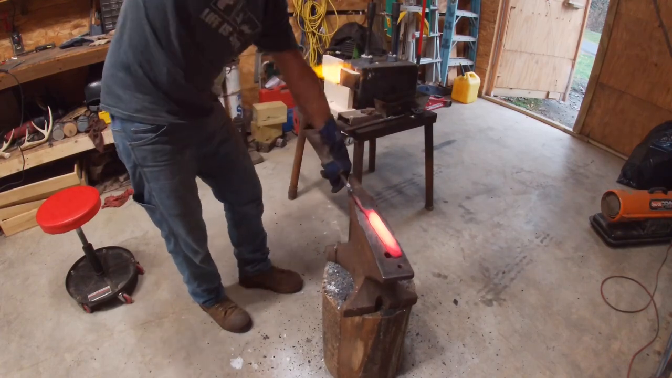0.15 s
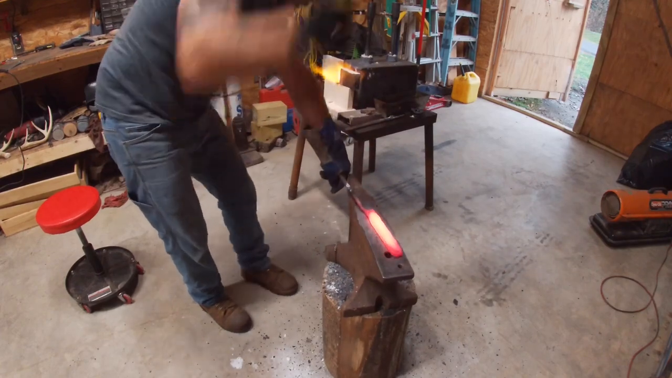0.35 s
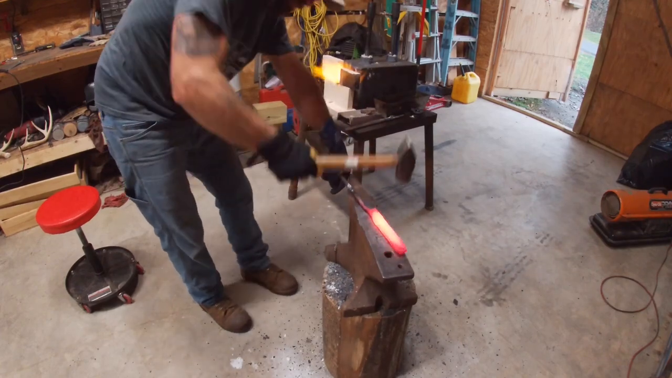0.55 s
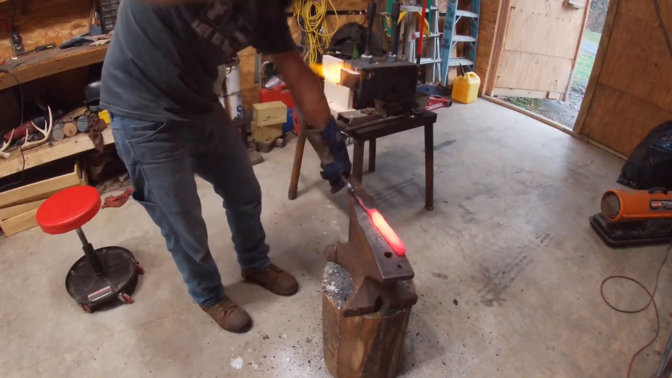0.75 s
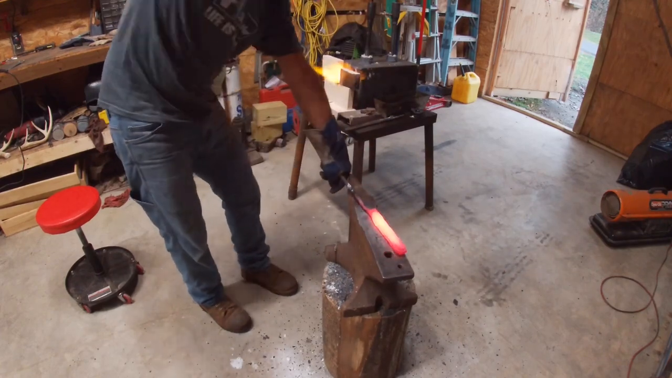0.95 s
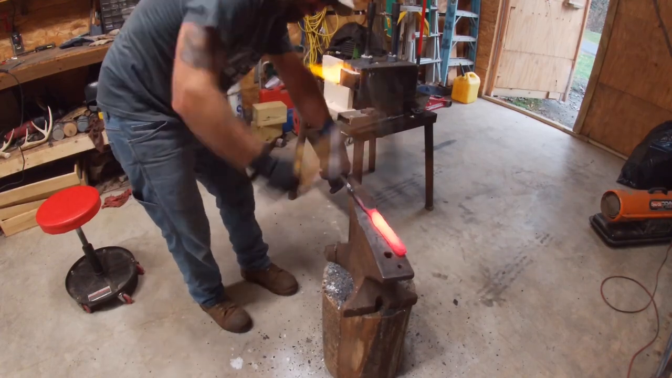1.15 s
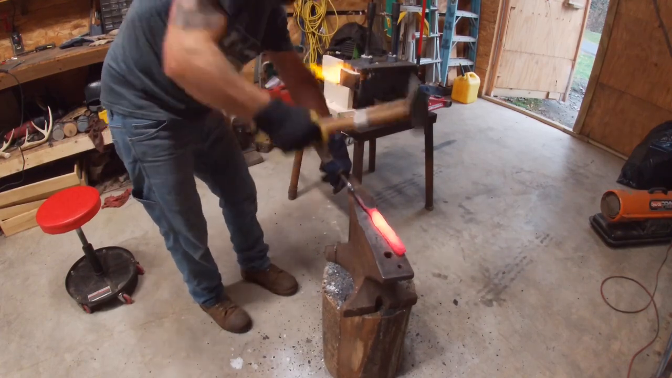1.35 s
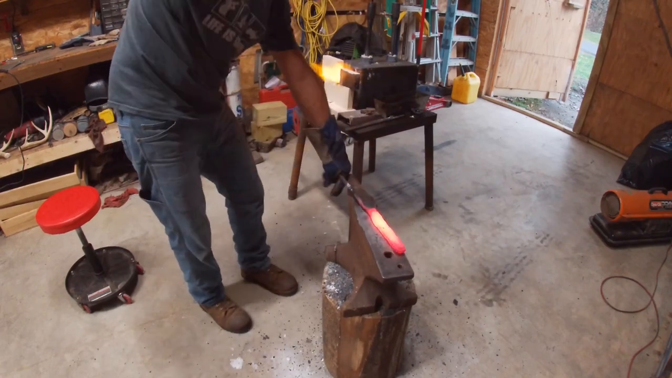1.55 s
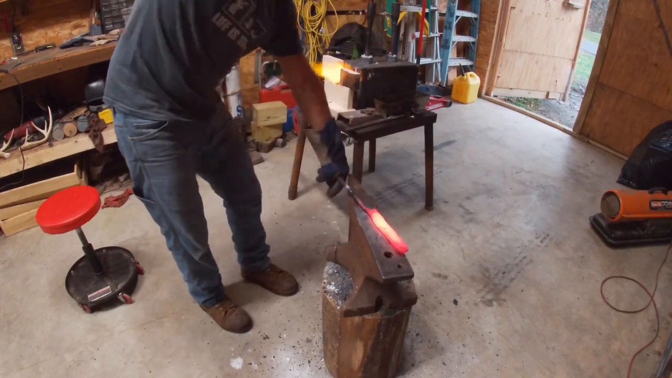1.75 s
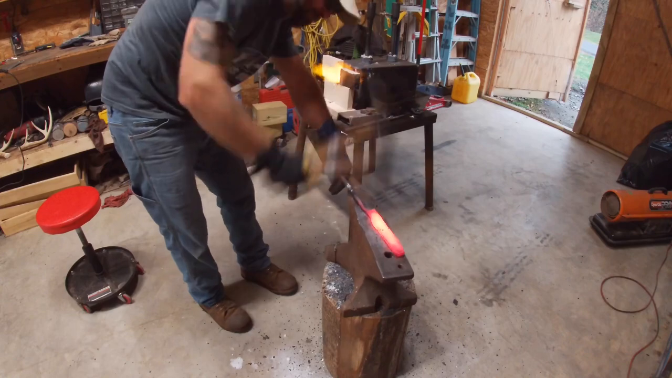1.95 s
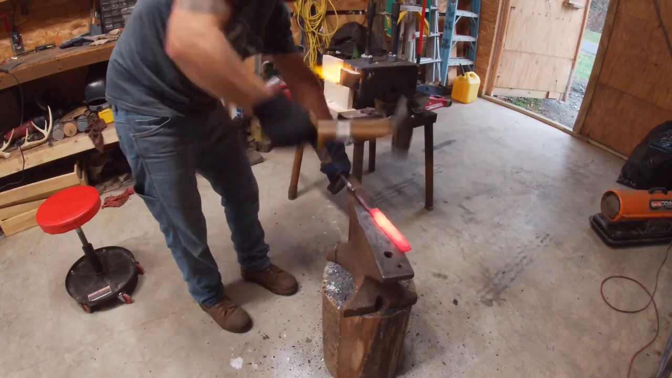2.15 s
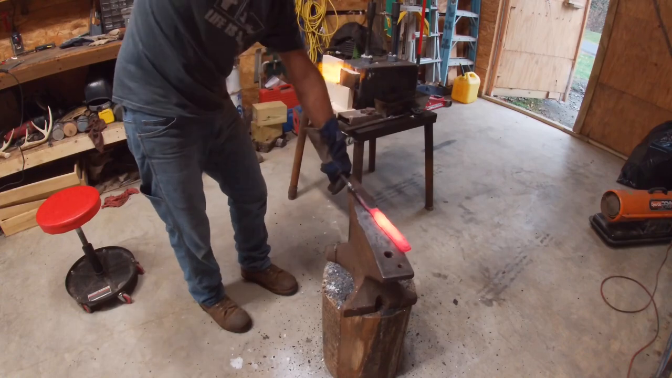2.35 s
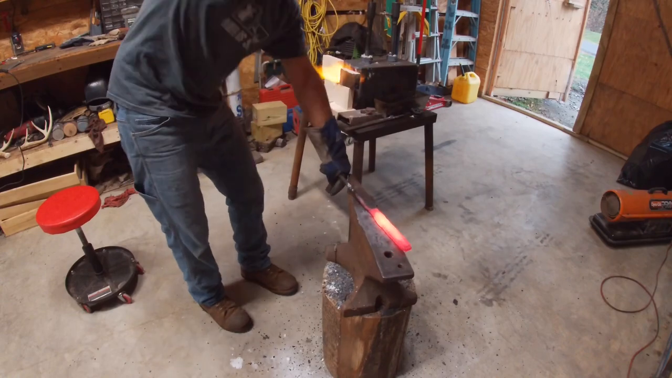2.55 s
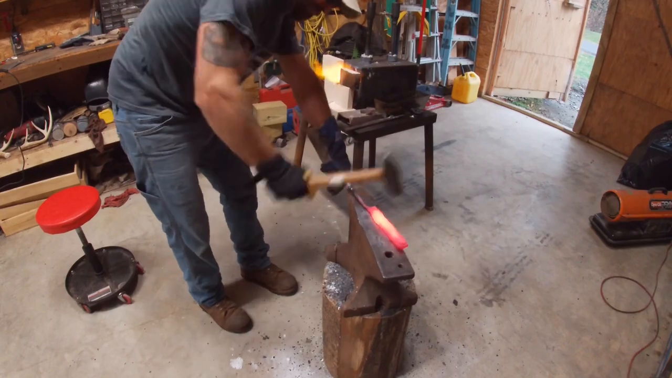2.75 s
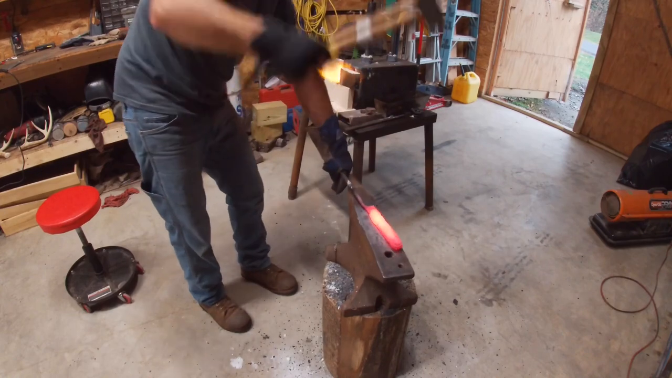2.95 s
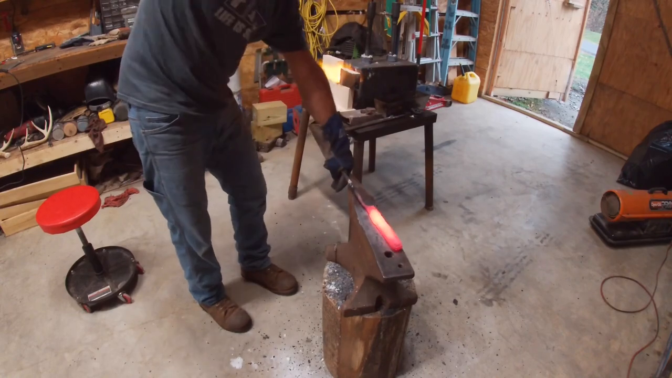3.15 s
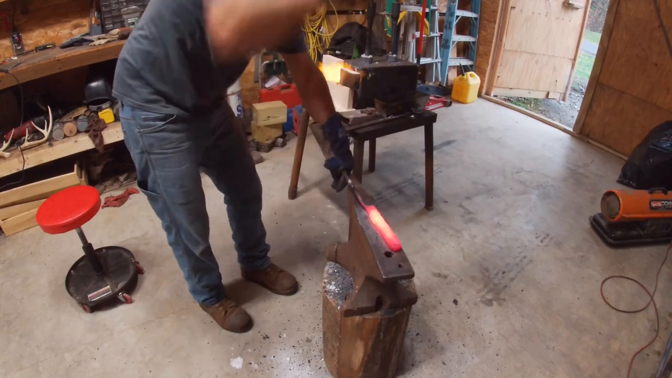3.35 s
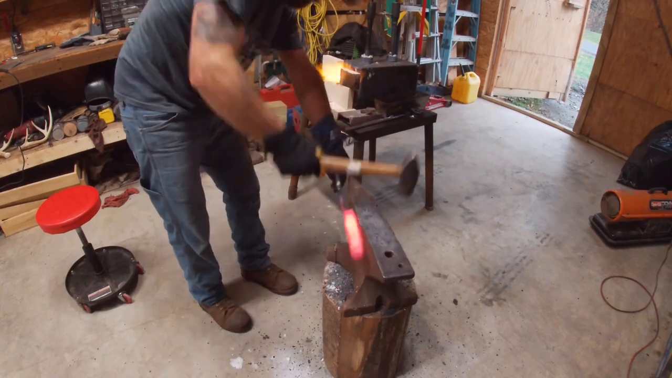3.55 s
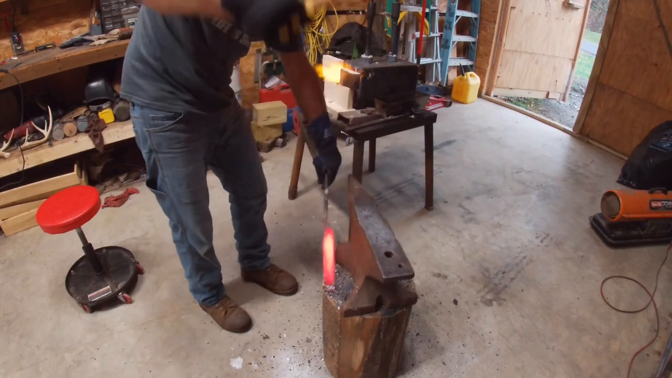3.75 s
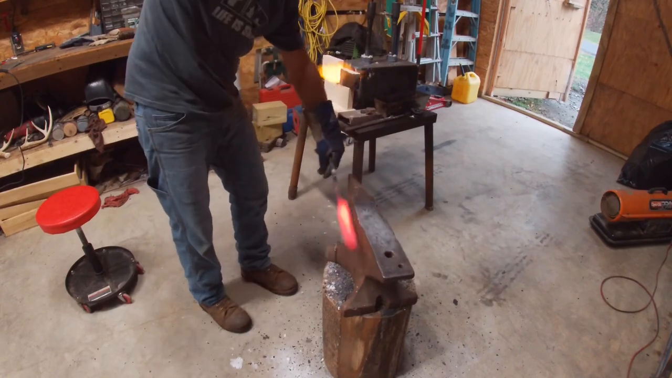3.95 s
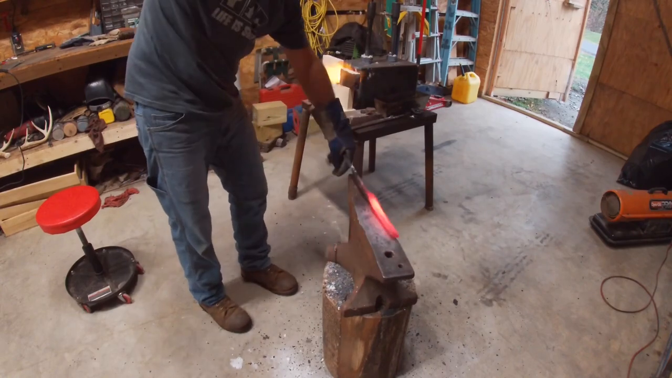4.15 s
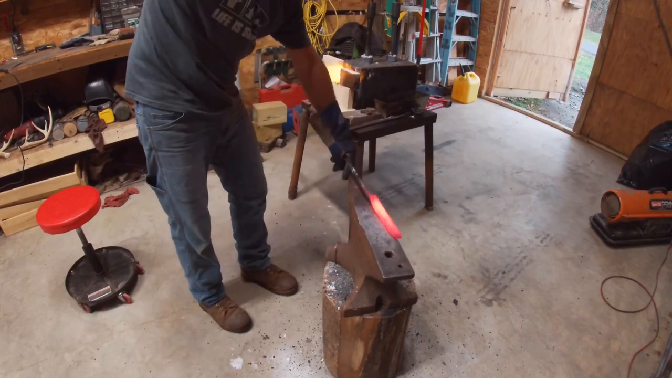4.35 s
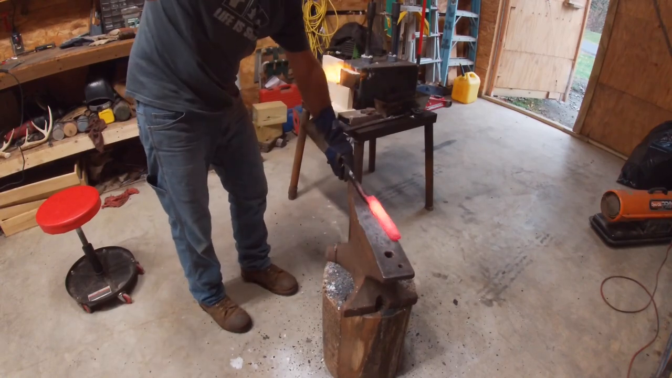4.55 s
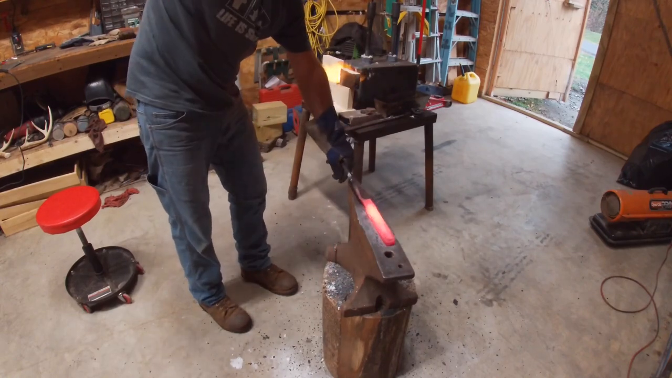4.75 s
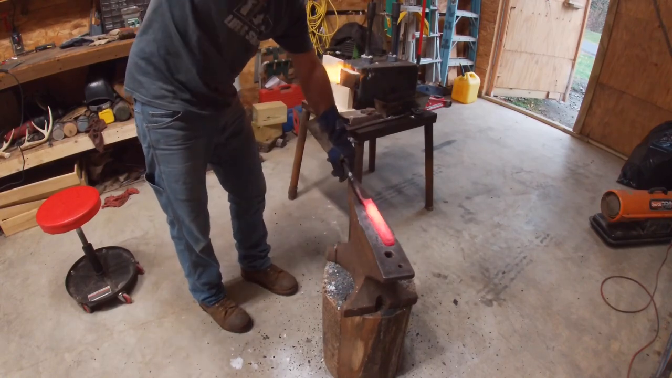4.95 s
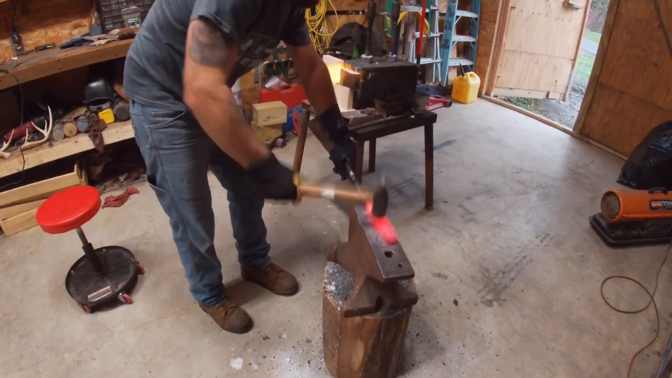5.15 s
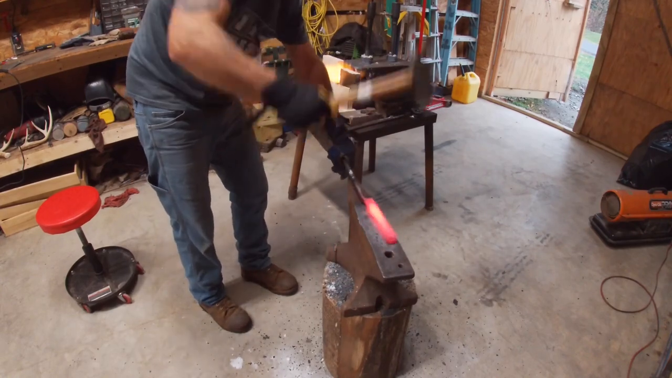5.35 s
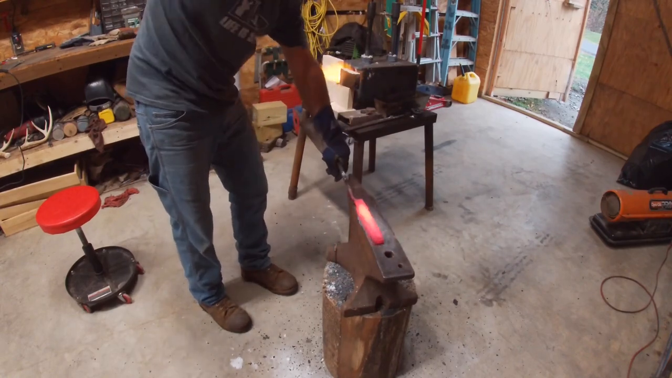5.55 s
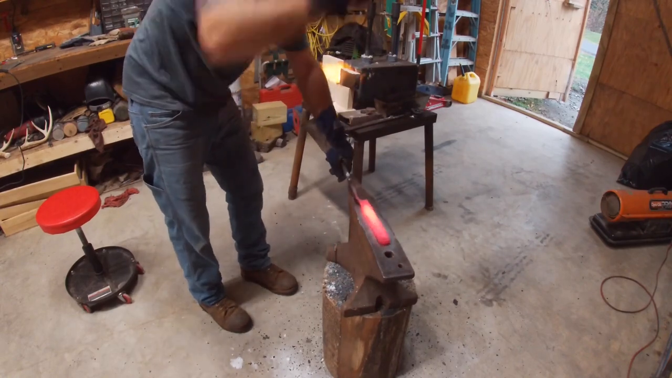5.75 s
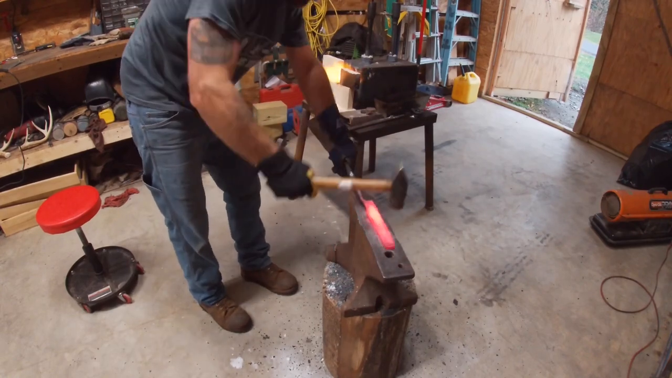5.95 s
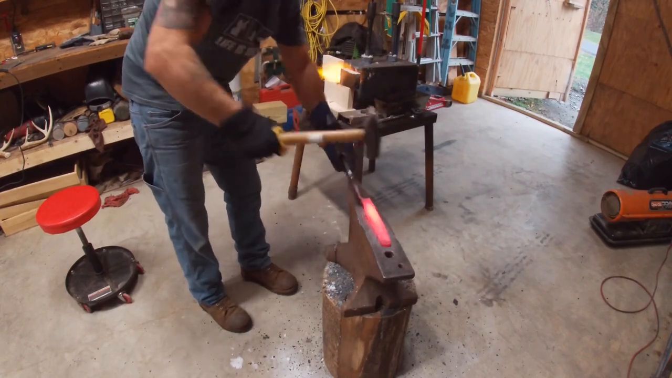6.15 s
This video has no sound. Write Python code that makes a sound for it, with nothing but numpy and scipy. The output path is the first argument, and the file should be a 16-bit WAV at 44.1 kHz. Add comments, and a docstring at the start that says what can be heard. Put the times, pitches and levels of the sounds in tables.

```python
"""In a garage, a hand hammer forges a glowing bar on an anvil that stands on a wooden stump.
Each blow layers a noise crack, a choked modal clang and a modal thump through the stump; the room rings on.
Light touches of steel let the anvil modes ring freely over a small noise tick.
A gas forge of shaped noise rumbles, hisses and faintly whistles behind.
Gain control ducks it at each blow and lets it swell in the pause."""
import sys
import numpy as np
from scipy import signal
from scipy.fft import rfft, irfft, next_fast_len
from scipy.io import wavfile
from scipy.ndimage import uniform_filter1d, minimum_filter1d

SR = 44100
rng = np.random.default_rng(int(sys.argv[2]) if len(sys.argv) > 2 else 0)


def materialize(psi):
    """Save the field psi as 16-bit PCM at rate SR to the path in sys.argv[1].

    A 1-D psi becomes a single channel; in a 2-D psi each row is a channel.
    """
    bounded = np.clip(np.atleast_2d(psi).T, -1, 1)
    quanta = np.round(bounded * 32767).astype(np.int16)
    wavfile.write(sys.argv[1], SR, quanta)


N = 277389
SIZE = 2 ** 15  # samples in one struck sound
T = np.arange(SIZE) / SR  # its time axis in seconds


# Hammer blows. Each row: start in seconds, force in dB, crack level in dB, brightness in dB per octave,
# anvil clang level in dB, steel partials level in dB, level of the swell into the crack in dB.
HAMMER_BLOWS = [(0.46, -5, -9.5, -0.5, -22, -40, -0.5), (1.203, 0.5, -9, 0, -28, -34, 2.5),
                (1.9998, 3, -11, -0.8, -25, -39.5, 1), (2.7325, 4.5, -8, 0, -20, -33, 2.5),
                (3.477, 5.5, -5.5, -1.5, -35.5, -54, -2.5), (5.1832, -2.5, -3.5, -1, -30, -33, 2),
                (5.9005, 1.5, -7, -1.9, -18, -56, -0.5)]
# Balance inside a blow, before its own levels are added (dB).
THUMP_DB, ROOM_DB = -7, -21
# The thump follows the force fully; the metal grows less (dB per dB of force).
METAL_GROWTH = 0.34


def hammer(change=0.82):
    """Heavy blows: the soft hot bar lies between hammer and anvil and chokes the clang."""
    out = np.zeros(N)
    walls = noise(ROOM_SPECTRUM, SIZE)  # the anvil stays put, so every blow meets partly the same room tail
    for s, force_db, crack_db, tilt_db, clang_db, steel_db, swell_db in HAMMER_BLOWS:
        crack = amp(crack_db) * contact(tilt_db) * amp(-60 * T / 0.013)
        clang = amp(clang_db) * anvil(scatter_db=0.5, choke=5.1)
        steel = amp(steel_db) * steel_partials()
        room = amp(ROOM_DB) * room_tail(walls, change, tilt_db)
        ringing = diffused(clang, wet_db=0.0) + diffused(steel, wet_db=1)
        metal = echoed(crack) + ringing + room
        add(out, s, amp(METAL_GROWTH * force_db) * metal)
        add(out, s + 0.00155, amp(THUMP_DB + force_db) * echoed(thump()))
        # the peak of the swell falls on the blow
        add(out, s - T.mean(), amp(swell_db) * lead_in())
    return out


# Noise colour of metal contact. Each row: frequency in Hz, relative level in dB per Hz.
CRACK_SPECTRUM = [(200, -6.5), (700, -9.5), (1150, -4), (1700, 5.5), (2200, 0.5), (2700, -6), (3200, 0.5),
                  (4000, -16), (6200, -8), (7200, -18.5), (10000, -16.5), (11500, -35), (15500, -46)]


def contact(tilt_db):
    """Metal contact as noise coloured by the clank; tilt sets how bright it is."""
    return metallic(noise(CRACK_SPECTRUM, SIZE), tilt_db)


# Broad resonances of anvil, bar and hammer pressed together.
# Each row: centre in Hz, half-width of the bell curve in Hz, lift in dB.
CLANK_RESONANCES = [(1480, 92, 2.5), (2270, 184, 10), (3046, 340, 5.5), (3750, 240, 9), (4340, 370, 6),
                    (4820, 110, 3.5), (5155, 250, 6.5), (5890, 270, 2), (9620, 220, 7)]


def metallic(x, tilt_db):
    """Colours a sound with the clank's resonances; a higher tilt makes it brighter."""
    hz = np.fft.rfftfreq(len(x), 1 / SR)
    lift_db = sum(db * np.exp(-2 * ((hz - centre) / width) ** 2)
                  for centre, width, db in CLANK_RESONANCES)
    octaves_above_2k = np.log2(np.maximum(hz / 2000, 1))
    coloured = rfft(x) * amp(lift_db + tilt_db * octaves_above_2k)
    return unit(irfft(coloured, len(x)))


# Anvil modes when left free. Each row: frequency in Hz, relative level in dB, t60 in seconds.
ANVIL_MODES = [(1535, 1, 0.27), (1650, -21, 0.1), (2020, -22, .2), (2430, -10.5, 0.2), (2830, -20.5, 0.15),
               (3180, -12.5, 0.18), (3865, -25, 0.2), (4320, -19.5, .13), (5000, -24, 0.2),
               (6912, -31, .08)]


def anvil(scatter_db, choke=1):
    """The struck anvil rings in decaying modes; choke divides their decay times."""
    return ring(ANVIL_MODES, scatter_db, choke)


# Lasting partials of the steel. Each row: frequency in Hz, relative level in dB, t60 in seconds.
STEEL_MODES = [(990, -9.5, 0.34), (1063, -5, 0.45), (1490, -3, 0.33), (2140, -2, .4), (2195, -6.5, 0.33),
               (2197, -2.5, 0.4), (2240, -4, 0.28), (2301, -2.5, .38), (2336, -4, 0.48), (3086, -2.5, 0.36),
               (3656, -3, .33), (3745, -4.5, 0.28), (3870, 1, 0.28), (3900, -7, .3), (4370, -10.5, 0.26),
               (5160, -5, 0.3), (7160, -24.5, .35), (11174, -25.5, 0.28), (12825, -32, .3)]


def steel_partials():
    """Longer steel modes ring unchoked, with a new balance at each blow."""
    return ring(STEEL_MODES, scatter_db=2)


# Stump and floor under the anvil. Each row: frequency in Hz, relative level in dB, t60 in seconds.
STUMP_MODES = [(48, -22, 0.51), (95.4, -6, 0.065), (119.7, 1, 0.13), (172.4, 0.5, 0.098), (199, -3, 0.12),
               (217.2, -1, 0.12), (279.2, 0.5, 0.068), (337.5, 2, 0.047), (398, -4, 0.047),
               (438, -6, 0.052), (487, -7, 0.068)]
# Anvil rocking back onto the stump. One row: frequency in Hz, relative level in dB, t60 in seconds.
ROCK_MODE = (122, 0, 0.052)
# Standing waves of the garage. Each row: frequency in Hz, relative level in dB, t60 in seconds.
BOOM_MODES = [(114.8, 0.5, 0.77), (286.5, 5, 0.17), (355, -4.5, 0.15), (390, 7, 0.32), (448, -3.5, 0.35),
              (554, -8, 0.49), (602, -4.5, .5), (632, -11, 0.3), (745, 1, 0.46), (801, -6.5, 0.53),
              (932, -11.5, 0.28)]
ROCK_AFTER_S = 0.091


def thump():
    """The blow drives anvil and stump against the floor; the anvil lifts and settles again."""
    body = ring(STUMP_MODES) * (1 - np.exp(-T / 0.0018))
    boom = amp(-21.0) * ring(BOOM_MODES, scatter_db=1.0) * (1 - np.exp(-T / 0.032))
    settling = ring([ROCK_MODE]) * (1 - np.exp(-T / 0.0046))
    add(body, ROCK_AFTER_S, settling)
    return body + boom


# Colour of the bright rush. Each row: frequency in Hz, relative level in dB per Hz.
RUSH_SPECTRUM = [(40, -8), (300, 0), (600, 3), (1200, -9), (1550, 6), (2400, 0.5), (3500, -6), (6200, -0.5),
                 (7300, -30.5), (12000, -20.5), (15500, -61)]
# Colour of the dull push. Each row: frequency in Hz, relative level in dB per Hz.
PUSH_SPECTRUM = [(20, -27), (50, -9.5), (110, 1), (300, -5), (480, -8), (650, -15), (1200, -38.5),
                 (5000, -65)]
RUSH_DB, PUSH_DB = -19.5, -12.5  # balance of the two, before the blow's swell level


def lead_in():
    """A short bright rush and a dull push of noise swell into the crack."""
    rush = amp(RUSH_DB) * swell(RUSH_SPECTRUM, rise_t60=0.046, fall_t60=0.019)
    push = amp(PUSH_DB) * swell(PUSH_SPECTRUM, rise_t60=0.049, fall_t60=0.079)
    return rush + push


# Light touches of bar or hammer on the anvil. Each row: start in seconds, level in dB.
LIGHT_TOUCHES = [(3.675, -33), (4.148, -51.5), (5.987, -36), (6.008, -29.5), (6.26, -36.5)]


def touches():
    """Steel meets the bare anvil lightly: a small dull tick and a clear ring."""
    out = np.zeros(N)
    for s, db in LIGHT_TOUCHES:
        tick = amp(-2) * contact(tilt_db=-8) * amp(-60 * T / 0.051)
        ping = diffused(anvil(scatter_db=1), wet_db=-17.5)
        soft_onset = 1 - np.exp(-T / 0.0019)
        add(out, s, amp(db) * (ping + tick) * soft_onset)
    return out


# Colour of the room's answer. Each row: frequency in Hz, relative level in dB per Hz.
ROOM_SPECTRUM = [(30, 13), (60, 6), (110, 2.5), (300, 13), (520, 11.5), (790, 7), (950, 3), (1250, -2),
                 (1900, 0.5), (2600, -5), (4000, -8), (6200, -4.5), (7200, -17), (10000, -19),
                 (11000, -24.5), (15500, -38.5)]


def room_tail(walls, change, tilt_db):
    """The room's answer as decaying noise, partly shared by all blows and partly new each time."""
    answer = walls + change * noise(ROOM_SPECTRUM, SIZE)
    return reverberation(metallic(answer, tilt_db))


# Decay of the garage. Each row: frequency in Hz, t60 in seconds.
GARAGE_DECAY = [(60, 1), (200, 0.3), (700, 0.45), (2000, 0.36), (5000, 0.34), (9000, 0.24), (15000, 0.25)]


def reverberation(x, level_s=0.15, rise=0.0032):
    """The tail stays level briefly, then each band dies at its own speed."""
    hz, t, z = signal.stft(x, SR, nperseg=256)
    fading_s = np.hypot(t, level_s) - level_s  # starts flat, then runs with time
    z = z * amp(-60 * fading_s / read(GARAGE_DECAY, hz)[:, None])
    return signal.istft(z, SR, nperseg=256)[1][:SIZE] * (1 - np.exp(-T / rise))


# First echoes from floor, bench and walls. Each row: delay in seconds, level in dB.
FIRST_ECHOES = [(.0027, -12), (.0075, -15), (0.0125, -19.5), (0.0394, -25.5), (.0495, -18)]


def echoed(x, edge_hz=7500):
    """Adds the first reflections, dulled by the clutter of the workshop."""
    out = x.copy()
    dull = signal.sosfilt(signal.butter(2, edge_hz, fs=SR, output="sos"), x)
    for delay, db in FIRST_ECHOES:
        add(out, delay, amp(db) * dull)
    return out


def diffused(x, wet_db):
    """A ring comes back from all sides of the room, so its partials waver as they fade."""
    tail = rng.standard_normal(SIZE) * amp(-60 * T / 0.36)
    tail = tail / np.linalg.norm(tail)
    return x + amp(wet_db) * signal.fftconvolve(x, tail)[:SIZE]


# Course of the flame's rumble. Each row: time in seconds, level in dB before gain control.
RUMBLE_LEVEL = [(0, -35.5), (.85, -37.5), (1.55, -31.5), (3.3, -33.5), (3.75, -25.5), (4.4, -30.5),
                (5.1, -37), (6.29, -30)]
# Colour of the rumble. Each row: frequency in Hz, relative level in dB per Hz.
RUMBLE_SPECTRUM = [(12, -55.5), (20, -30.5), (37, -13), (92, -11), (215, -0.5), (249, -3.5), (375, -11.5),
                   (425, -19), (465, -7), (525, -25), (602, -17), (675, -31), (770, -27), (1000, -57),
                   (1300, -65.5), (2200, -120)]
# Colour of the gas jet. Each row: frequency in Hz, relative level in dB per Hz.
HISS_SPECTRUM = [(400, -35.5), (750, 0.5), (950, -6), (1400, -11), (1800, -15.5), (2400, -18.5),
                 (3000, -19.5), (4200, -27), (5900, -23), (7300, -43.5), (9800, -41.5), (11000, -47.5),
                 (15500, -66.5)]
# The burner's faint whistles. Each row: frequency in Hz, half-width in Hz, level in dB against the hiss.
BURNER_WHISTLES = [(1400, 45, -17), (2930, 110, -18), (3480, 40, -24)]
HISS_DB = -55.5  # steady, before gain control


def forge():
    """The burner's turbulent flame rumbles in its chamber; the gas jet hisses and faintly whistles."""
    s, rumble_db = np.transpose(RUMBLE_LEVEL)
    level_db = np.interp(np.arange(N) / SR, s, rumble_db)
    rumble = amp(level_db) * noise(RUMBLE_SPECTRUM, N)
    whistles = sum(amp(db) * whistle(hz, width) for hz, width, db in BURNER_WHISTLES)
    jet = noise(HISS_SPECTRUM, N) + whistles
    return rumble + amp(HISS_DB) * jet


def whistle(hz, width):
    """Noise in one narrow resonance."""
    offset = (np.fft.rfftfreq(N, 1 / SR) - hz) / width
    return unit(irfft(rfft(rng.standard_normal(N)) * np.exp(-2 * offset ** 2), N))


def ring(modes, scatter_db=0, choke=1):
    """Struck modes; where the blow lands changes their strengths, and choke shortens them."""
    hz, db, t60 = np.transpose(modes)[:, :, None]
    db = db + scatter_db * rng.standard_normal(hz.shape)
    decay = amp(db - 60 * T * choke / t60)
    return (decay * np.sin(2 * np.pi * hz * T)).sum(0)


def swell(spectrum, rise_t60, fall_t60):
    """A short burst of noise that grows up to its middle and falls away again."""
    t = T - T.mean()
    return noise(spectrum, SIZE) * amp(-60 * np.maximum(-t / rise_t60, t / fall_t60))


def noise(spectrum, size):
    """Noise of rms 1 with a given spectrum."""
    length = next_fast_len(size, real=True)
    hz = np.fft.rfftfreq(length, 1 / SR)
    shaped = rfft(rng.standard_normal(length)) * amp(read(spectrum, hz))
    return unit(irfft(shaped, length)[:size])


def amp(db):
    """Decibels to gain."""
    return 10 ** (np.asarray(db) / 20)


def unit(x):
    """Scales to rms 1."""
    return x / np.sqrt(np.mean(x ** 2) + 1e-20)


def read(points, hz):
    """Reads a table on a log-frequency axis."""
    f, value = np.transpose(points)
    return np.interp(np.log(hz + 1), np.log(f + 1), value)


def add(mix, s, sound):
    """Mixes a sound in at time s."""
    part = mix[round(s * SR):][:len(sound)]
    part += sound[:len(part)]


# Level a blow is held to, gain at the start and highest gain (dB).
AIM_DB, START_GAIN_DB, MOST_GAIN_DB = -11.5, 5.5, 13
HOLD_S, RECOVER_DB_PER_S = 0.49, 17


def gain_control(x):
    """Each blow pushes the gain down; it waits, then creeps back, so the forge swells in a pause."""
    power = uniform_filter1d((x ** 2).mean(0), size=1765)  # 40 ms average
    power_db = 10 * np.log10(abs(power) + 1e-12)
    wanted_db = np.minimum(AIM_DB - power_db, MOST_GAIN_DB)
    wanted_db[0] = START_GAIN_DB
    half = round(HOLD_S * SR / 2)
    # the shifted window looks back only, so a low gain is held
    held_db = minimum_filter1d(wanted_db, 2 * half + 1, origin=half, mode="nearest")
    # a running minimum against a steady climb limits how fast the gain recovers
    climb_db = RECOVER_DB_PER_S * np.arange(N) / SR
    return x * amp(np.minimum.accumulate(held_db - climb_db) + climb_db)


def scene():
    """Everything at the microphone."""
    return (hammer() + touches() + forge())[None]


EDGE_HZ = 15700  # upper band limit


def record(dry, ceiling=0.9):
    """Sheds the deepest bass, rides the blows, holds the peaks with a fast limiter, then limits the band."""
    thinned = signal.sosfilt(signal.butter(2, 35, "highpass", fs=SR, output="sos"), dry)
    levelled = gain_control(thinned)
    allowed = np.minimum(1, ceiling / (abs(levelled) + 1e-9))
    limited = levelled * uniform_filter1d(minimum_filter1d(allowed, size=129), size=129)
    lowpass = signal.firwin(511, EDGE_HZ, window=("kaiser", 9), fs=SR)
    return signal.oaconvolve(limited, lowpass[None], "same")


dry = scene()
out = record(dry)
materialize(out)
```